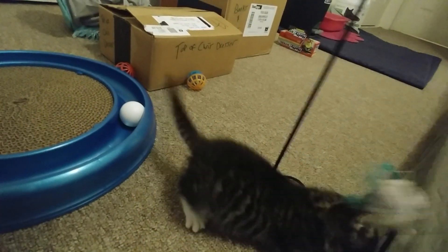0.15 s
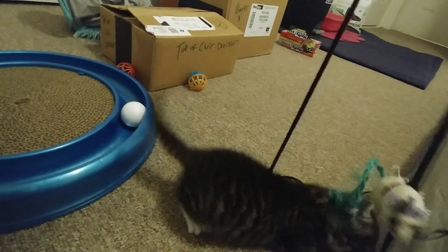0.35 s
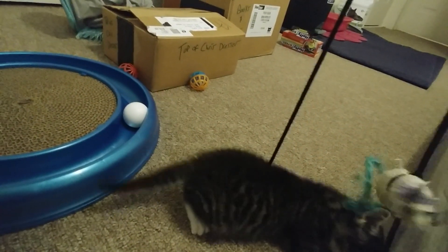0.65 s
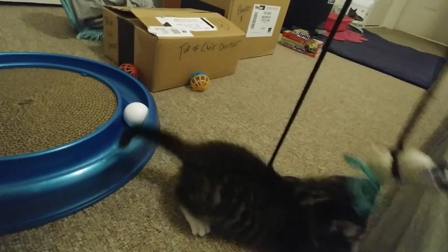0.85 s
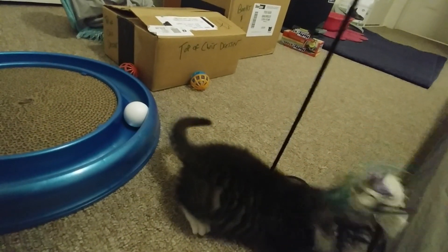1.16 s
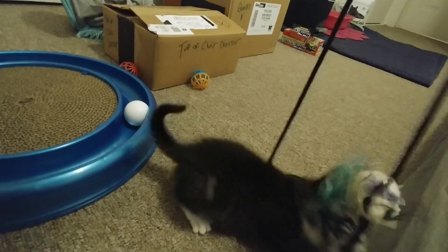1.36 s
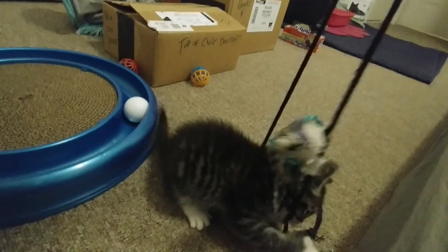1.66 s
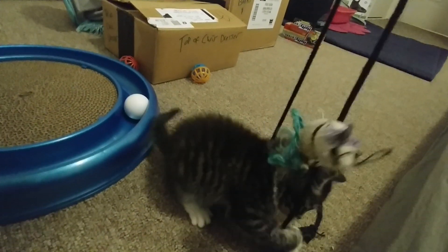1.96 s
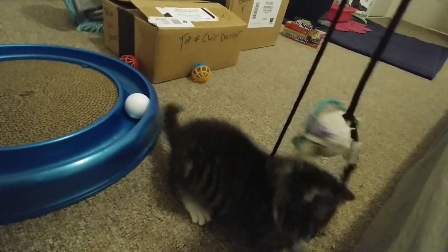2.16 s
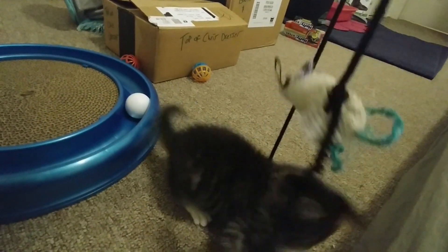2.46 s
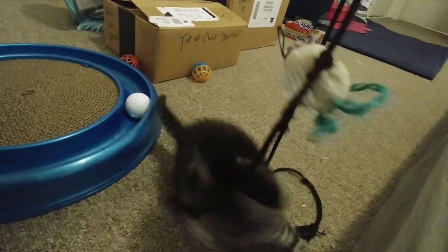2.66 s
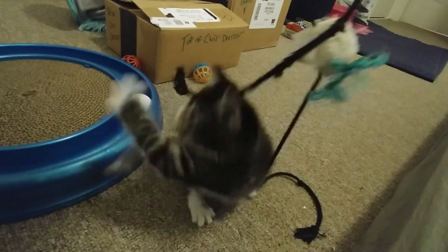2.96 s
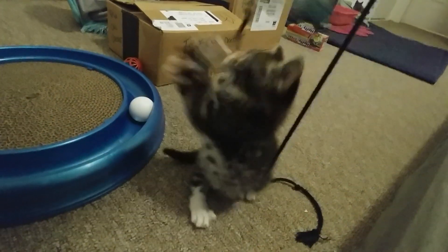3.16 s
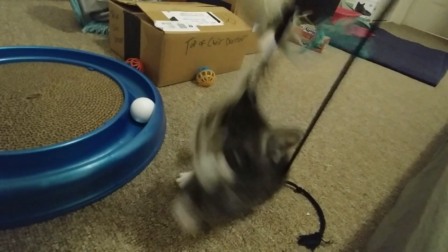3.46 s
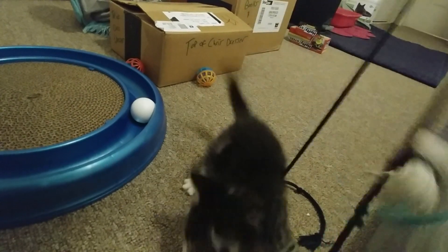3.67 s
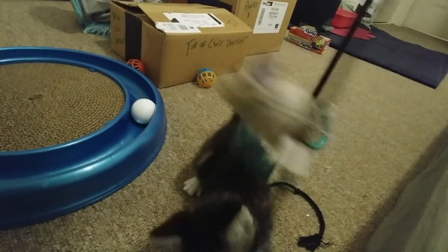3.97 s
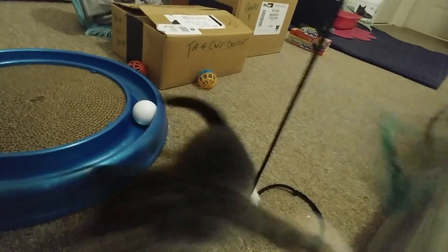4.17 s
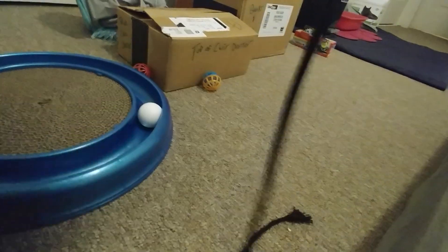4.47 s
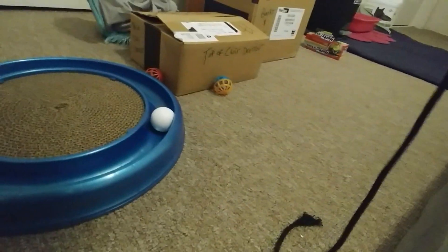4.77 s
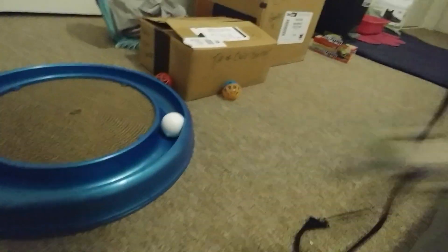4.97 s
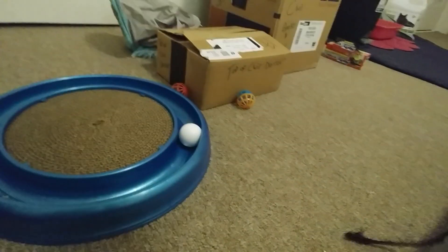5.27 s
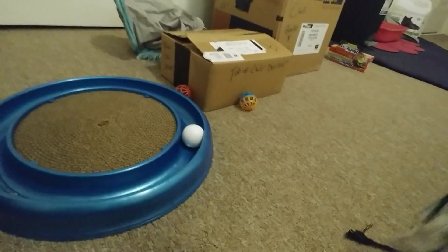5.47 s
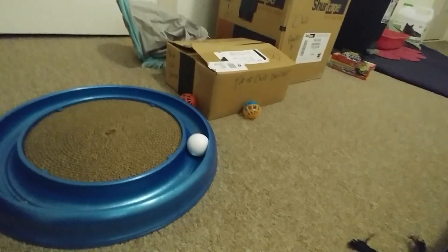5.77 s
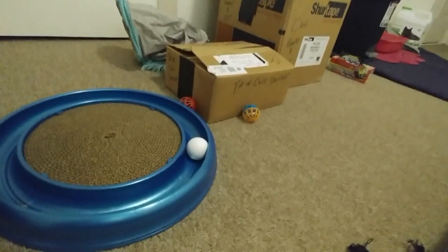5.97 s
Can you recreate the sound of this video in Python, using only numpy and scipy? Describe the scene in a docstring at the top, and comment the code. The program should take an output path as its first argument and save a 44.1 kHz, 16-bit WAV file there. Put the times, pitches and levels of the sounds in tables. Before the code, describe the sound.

A quiet low rumble and fine hiss fill a small room throughout. Right at the start a kitten lunges at a soft toy, with a dull paw thump and a short rasp of fur on cloth, close to the microphone. Very faint, thin high squeaks come and go during the first two seconds, with claw clicks near 0.9 and 1.5 seconds. At about 2.2 seconds paws thud on carpet with a tiny rip, and more thumps and a sharp click follow around 2.7. Softer landings, ticks and light brushes are scattered from 3.4 to 4.4 seconds. The loudest moment comes at about 4.5 seconds: a quick cluster of sharp snaps from claws and the toy's cord, with heavier paw thumps. Between 5.3 and 5.7 seconds there is a click, a brief scratch and a few light steps, then only the room hiss.

```python
"""Faint squeaks over low room rumble and hiss; then a kitten lunges at a soft toy on a cord.
Fur and cloth scrape past two close microphones: thousands of tiny fibre slips per stroke.
Paws thump the carpeted floor, which rings briefly. Claws tick as they snag, rip through pile
or cloth and let go; the cord snaps taut. The small room adds a short tail."""
import sys
import numpy as np
from scipy import signal
from scipy.fft import rfft, irfft, next_fast_len
from scipy.io import wavfile
from scipy.ndimage import uniform_filter1d

SR = 44100
rng = np.random.default_rng(int(sys.argv[2]) if len(sys.argv) > 2 else 0)


def waveform_to_disk(signal):
    """Save audio, clipped to [-1, 1], as 16-bit WAV at the path in sys.argv[1]."""
    frames = np.transpose(np.atleast_2d(signal))
    scaled = np.clip(frames, -1, 1) * 32767
    samples = np.round(scaled).astype(np.int16)
    wavfile.write(sys.argv[1], SR, samples)


N = 269539

# faint squeaks (start [s], pitch [Hz], bandwidth [Hz], level [dB], length [s])
SQUEAK_EVENTS = [(-.045, 7170, 210, -61, 0.17), (0.01, 3130, 110, -63.5, .22),
                 (0.527, 8160, 330, -64.5, .15), (0.536, 5170, 199.2, -73.5, 0.18),
                 (0.891, 3010, 200, -62.5, 0.16), (0.944, 5110, 270, -72, .19),
                 (0.999, 3230, 345, -61, 0.16), (1.217, 6070, 300, -73, 0.12),
                 (1.296, 3560, 660, -64.5, 0.15), (1.298, 7140, 70, -76, 0.15), (1.823, 5260, 70, -80, .19)]
# rumble and hiss spectrum (frequency [Hz], relative level [dB])
AIR_SPECTRUM = [(25, -40), (37, -17.5), (86, -1), (123, -19), (161, -7), (200, -15.5), (316, -16.5),
                (604, -20), (750, -21.5), (4450, -30.5), (5370, -28.5), (8050, -37), (15800, -40)]
# rumble and hiss likeness (frequency [Hz], left-right correlation [0..1])
AIR_CORRELATION = [(60, 0.74), (240, 0.39), (950, 0), (3770, 0), (15000, 0.0)]
# rumble and hiss balance (frequency [Hz], left minus right [dB])
AIR_BALANCE = [(300, 3), (12000, 0.5)]
# light touches of fur and toy (peak time [s], level [dB], length [s], ring [Hz])
BRUSH_EVENTS = [(0.075, -64, 0.15, 2480), (0.132, -45.5, 0.012, 3060), (0.265, -58, 0.02, 3220),
                (0.4, -47, 0.017, 1460), (0.482, -59.5, 0.079, 1270), (0.769, -50.5, 0.038, 1350),
                (0.801, -44.5, 0.036, 1580), (1.424, -67, 0.13, 5560), (2.172, -51, 0.063, 1350),
                (2.494, -55.5, 0.02, 4870), (3.157, -64.5, 0.036, 5700), (4.145, -60.5, 0.077, 1070),
                (4.193, -53.5, 0.045, 3160), (4.331, -62, 0.093, 2600), (4.609, -49.5, 0.068, 2670),
                (5.35, -57.5, 0.062, 1470), (5.574, -55, 0.065, 2030), (5.587, -52.5, 0.02, 2600),
                (5.695, -58.5, 0.086, 1560)]
# drag rasp, then hiss (level [dB], fade [dB/s], ring [Hz], ring gain [dB], tilt [dB/octave])
DRAG_BANDS = [(-42, 105, 1650, 8.5, -2.5), (-53.5, 4, 3250, 12, -2.5)]
# rubbed cloth spectrum (frequency [Hz], relative level [dB])
RUB_SPECTRUM = [(45, -6.5), (110, 6), (200, 1.5), (450, -5), (900, -1.5), (1800, -1), (2450, -7.5),
                (3300, -6.5), (5500, -6), (8000, -15.5), (10700, -38), (13000, -27), (16000, -31.5)]
# paw landings (time [s], level [dB], floor pitch [Hz], hardness [dB], knock [Hz])
LANDINGS = [(0.118, -41, 136, -22, 300), (0.393, -51, 83, -6, 250), (0.926, -43.5, 104, -0.5, 294),
            (2.163, -37.5, 139, -8.5, 275), (2.177, -38.5, 144, -8, 363), (2.211, -31.5, 86.8, -11, 224),
            (2.487, -54.5, 116, -2.5, 313), (2.622, -36.5, 147, -0.5, 314), (2.702, -35.5, 146, -1, 310),
            (3.407, -39.5, 98.3, -17, 225), (3.421, -39.5, 87, -27, 190), (3.627, -45.5, 76, -19, 223),
            (3.669, -42.5, 82, -11.5, 225), (4.187, -49.5, 155, -7, 370), (4.383, -45.5, 185, -4.5, 340),
            (4.421, -42, 136, 1, 249), (4.497, -37.5, 131, 1, 379), (4.517, -31, 167, -3, 290),
            (4.529, -31.5, 109.4, -12, 213), (4.594, -30, 90.5, -1.5, 218), (4.725, -48.5, 145, -6, 221),
            (5.335, -53, 143, 1.5, 312), (5.482, -42, 122, -16, 370), (5.588, -45.5, 93, -4, 276),
            (5.669, -45, 138, -10, 284)]
# floor modes (frequency [Hz], relative level [dB], t60 [s])
FLOOR_RING = [(87, 0, .3), (225, -5, .25), (308, -5, .25)]
# paw pad slap spectrum (frequency [Hz], relative level [dB])
PAD_SPECTRUM = [(40, -15), (120, -8), (310, 3), (480, -12), (800, 0), (1500, -30), (16000, -69)]
# claw snags, cord snapping taut (time [s], level [dB], ring [Hz], ring gain [dB], ring width [octaves])
TICK_EVENTS = [(0.265, -43, 3600, 13, .6), (0.403, -42, 1430, -2, .4), (0.8023, -39, 1500, 16, 1),
               (0.9241, -32, 910, 19.5, 0.96), (0.924, -39.5, 7600, 14, 0.25),
               (0.941, -41.5, 7400, 13, 0.15), (1.225, -54.5, 5000, 20, 0.67),
               (1.400, -47.5, 5770, 8, 0.22), (1.524, -37.5, 7640, 30, 0.13), (2.15, -46, 5460, -6, .3),
               (2.162, -44, 4470, 11, 0.27), (2.2608, -45.5, 4500, 4, .5), (2.486, -48, 4850, 6, .3),
               (2.69, -38.5, 1700, 6, 0.22), (2.7009, -27, 4070, 3, 0.48), (3.029, -51.5, 4640, 34, 0.27),
               (3.668, -50, 1440, 13, 0.3), (3.8796, -41.5, 4520, 15, 0.28), (4.192, -36, 1270, 9, 0.19),
               (4.386, -40, 2090, 11, 0.34), (4.4807, -35, 1500, 8, .4), (4.497, -28, 900, 16, 0.51),
               (4.5097, -20, 1564, 14.5, 0.16), (4.5108, -20, 5730, 11.5, 0.17),
               (4.5135, -23.5, 1630, -17, 0.58), (4.5951, -34.5, 2370, 23, 0.28),
               (4.599, -34, 2330, 33, 0.17), (5.337, -42, 2060, 15.5, 0.63)]
# fibre snap spectrum (frequency [Hz], relative level [dB])
SNAP_SPECTRUM = [(60, -12.5), (250, 3.5), (500, -4), (1000, -4.5), (1900, -5.5), (2700, -14.5),
                 (3800, -9.5), (6000, -13.5), (8500, -17), (10700, -42), (13000, -24), (16000, -31)]
# claws tearing free (start [s], level [dB], length [s], ring [Hz], tilt [dB/octave])
RIP_EVENTS = [(2.184, -30.5, 0.022, 4250, 0.1), (2.612, -35.5, 0.01, 730, -13),
              (4.491, -33, 0.013, 850, -1), (4.508, -26, 0.0023, 5600, 6), (4.5935, -35, 0.0068, 2400, 0.5),
              (5.455, -32.5, 0.033, 2100, 5.5), (5.456, -38.5, 0.035, 6640, 10.5)]
# direction of the play (time [s], left lead [ms], left minus right [dB])
PLAY_BEARING = [(.9, -0.29, 1), (2.2, -0.31, 4), (2.7, -0.22, 0), (3.9, 0.048, 7.5), (4.2, -0.035, -1.5),
                (4.5, 0.337, 0), (5.35, 0.354, -2), (5.45, -0.33, -6.5)]
# left microphone faces the play, right is shaded (frequency [Hz], left minus right [dB])
MIC_SHADE = [(250, -1.5), (700, 7.5), (1400, 9.5), (2700, 7), (4500, 10), (7500, 0), (14000, 7.5)]
# room decay (frequency [Hz], t60 [s])
ROOM_T60 = [(100, 0.47), (1000, 0.13), (5000, 0.14), (16000, 0.17)]
SIDES = np.array([[.5], [-.5]])  # left and right shares of a balance


def amp(db):
    """Decibels to gain."""
    return 10 ** (np.asarray(db) / 20)


def unit_rms(x):
    """Scales to rms 1."""
    return x / np.sqrt(np.mean(x ** 2) + 1e-20)


def lookup(points, hz):
    """Reads a table on a log-frequency axis."""
    f, value = np.transpose(points)
    return np.interp(np.log(hz + 1), np.log(f + 1), value)


def add(mix, time_s, sound):
    """Mixes a stereo sound in at time_s."""
    start = round(time_s * SR)
    sound = sound[:, max(-start, 0):]
    part = mix[:, max(start, 0):][:, :sound.shape[1]]
    part += sound[:, :part.shape[1]]


def impulse(colour_db, size=2048):
    """Minimum-phase impulse response, energy 1, with spectrum colour_db(Hz)."""
    hz = abs(np.fft.fftfreq(size, 1 / SR))
    log_gain = np.log(amp(np.maximum(colour_db(hz), -100)))
    response = np.fft.ifft(np.exp(np.conj(signal.hilbert(log_gain)))).real[:size // 2]
    return response / np.linalg.norm(response)


def bump(hz, centre_hz, octaves):
    """Resonance curve, 1 at its centre."""
    return np.exp(-.5 * (np.log2((hz + 1) / centre_hz) / octaves) ** 2)


def placed(x, time_s):
    """Two microphones on a small body: each gets its own delay and colour."""
    times_s, leads_ms, pans_db = np.transpose(PLAY_BEARING)
    lead_ms, pan_db = np.interp(time_s, times_s, leads_ms), np.interp(time_s, times_s, pans_db)
    x = np.pad(x, ((0, 0), (16, 128)))
    size = next_fast_len(x.shape[1])
    hz = np.fft.rfftfreq(size, 1 / SR)
    delay_s = np.maximum(-2 * SIDES * lead_ms, 0) / 1000
    gain = amp(SIDES * (pan_db + lookup(MIC_SHADE, hz)))
    return irfft(rfft(x, size) * np.exp(-2j * np.pi * hz * delay_s) * gain, size)


def squeaks(sag=0.022, peak_at=0.29, pure_width_hz=45):
    """Thin, fuzzy whistles that swell fast and sag in pitch; narrow ones have a pure core."""
    out = np.zeros((2, N))
    for start_s, hz, width_hz, db, length_s in SQUEAK_EVENTS:
        progress = np.arange(0, length_s, 1 / SR) / length_s
        noise = rng.standard_normal((2, SR)) + 1j * rng.standard_normal((2, SR))
        lowpass = signal.butter(2, width_hz / 2, fs=SR, output="sos")
        fuzz = signal.sosfilt(lowpass, noise)[:, -len(progress):]
        pitch_hz = hz * (1 + sag * (peak_at - progress))
        carrier = np.exp(2j * np.pi * np.cumsum(pitch_hz) / SR)
        tone = unit_rms(((fuzz / fuzz.std() + pure_width_hz / width_hz) * carrier).real)
        swell = (progress / peak_at * np.exp(1 - progress / peak_at)) ** 2
        add(out, start_s, amp(db) * tone * swell)
    return out


def air(level_db=-66.5, waver_db=-0.82, top_db=3, top_hz=14500):
    """Low room rumble and fine hiss, wavering slightly."""
    frames, hz = N // 512 + 5, np.fft.rfftfreq(2048, 1 / SR)
    left_re, left_im, own_re, own_im, waver = rng.standard_normal((frames, len(hz), 5)).T
    waver = unit_rms(uniform_filter1d(uniform_filter1d(waver, size=60, axis=0), size=10, axis=1))
    correlation = lookup(AIR_CORRELATION, hz)[:, None]
    left = left_re + 1j * left_im
    right = correlation * left + np.sqrt(1 - correlation ** 2) * (own_re + 1j * own_im)
    colour_db = lookup(AIR_SPECTRUM, hz) + top_db * bump(hz, top_hz, octaves=.25)
    stereo_db = colour_db + SIDES * lookup(AIR_BALANCE, hz)
    spectra = np.array([left, right]) * amp(stereo_db[:, :, None] + waver_db * waver)
    sound = signal.istft(spectra, nperseg=2048, noverlap=1536)[1][:, :N]
    return amp(level_db) * sound / sound.mean(0).std()


def brushes(ring_db=5, rise_share=0.28, neutral_hz=2600, scuff_db=-9, scuff_s=0.019, scuff_hz=650):
    """Strokes that swell and fade: light touches, plus a scuff per landing."""
    scuffs = [(time_s + rise_share * scuff_s, db + hardness_db + scuff_db, scuff_s, scuff_hz)
              for time_s, db, _, hardness_db, _ in LANDINGS]
    for peak_s, db, length_s, ring_hz in BRUSH_EVENTS + scuffs:
        rise_s, fall_s = rise_share * length_s, (1 - rise_share) * length_s
        t = np.arange(-3 * rise_s, 6 * fall_s, 1 / SR)
        envelope = amp(db) * np.exp(-np.where(t < 0, (t / rise_s) ** 2, t / fall_s))
        tilt_db_oct = 3.5 * np.log2(ring_hz / neutral_hz)  # quicker brush: higher ring, brighter
        yield peak_s + t[0], envelope, ring_hz, ring_db, tilt_db_oct


def drag(start_s=0.11, length_s=0.24, attack_s=0.015, hold_s=0.065, release_s=0.028):
    """Strokes of the lunge: the body bites on cloth at once, holds, then loses speed."""
    t = np.arange(0, length_s + 6 * release_s, 1 / SR)
    contact = (1 - np.exp(-t / attack_s)) * np.exp(-np.maximum(t - length_s, 0) / release_s)
    for db, fade_db_per_s, ring_hz, ring_db, tilt_db_oct in DRAG_BANDS:
        envelope = contact * amp(db - fade_db_per_s * np.maximum(t - hold_s, 0))
        yield start_s, envelope, ring_hz, ring_db, tilt_db_oct


def scrapes(strokes, gain_db=-1, slips_per_s=10000, spread_db=2, ring_octaves=0.4, slack_ratio=0.82):
    """Sounds each stroke as clumps of tiny fibre slips; the ring climbs with pressure."""
    out = np.zeros((2, N))
    slips = (rng.random((3, N)) < slips_per_s / SR) * rng.standard_normal((3, N))
    slips = unit_rms(slips * amp(spread_db * np.minimum(rng.exponential(1, (3, N)), 4)))
    clumps_db = 3 * np.tanh(unit_rms(uniform_filter1d(rng.standard_normal(N), size=130)))
    slips = unit_rms((slips[0] + slips[1:]) * amp(clumps_db))  # shared fibres + each microphone's own
    for start_s, envelope, pressed_hz, ring_db, tilt_db_oct in strokes:
        span = (round(start_s * SR) + np.arange(len(envelope))) % N
        pressure = envelope / envelope.max()
        sound = 0
        for share, ring_hz in ((1 - pressure, slack_ratio * pressed_hz), (pressure, pressed_hz)):
            cloth = impulse(lambda f: lookup(RUB_SPECTRUM, f)
                            + ring_db * bump(f, ring_hz, ring_octaves)
                            + tilt_db_oct * np.log2(np.maximum(f / 300, 1)))
            sound = sound + signal.fftconvolve(slips[:, span] * envelope * share, cloth[None], axes=1)
        add(out, start_s, placed(amp(gain_db) * sound, start_s))
    return out


def thumps(rise_cycles=0.23, fall_cycles=1.63, ring_db=-23, slap_db=-17, slap_fall_s=0.014,
           knock_db=2, knock_fall_s=0.0092, pan_db=5):
    """A paw pushes the carpeted floor: a few low swings, a dull slap and knock; the floor rings on."""
    out, t = np.zeros((2, N)), np.arange(SR // 2) / SR
    pad = impulse(lambda f: lookup(PAD_SPECTRUM, f))
    for time_s, db, hz, hardness_db, knock_hz in LANDINGS:
        onset = 1 - np.exp(-(t * hz / rise_cycles) ** 2)
        swing = onset * np.exp(-t * hz / fall_cycles) * np.sin(2 * np.pi * hz * t)
        knock = onset * np.exp(-t / knock_fall_s) * np.sin(2 * np.pi * knock_hz * t)
        ring = 0
        for mode_hz, mode_db, t60_s in FLOOR_RING:
            mode = np.sin(2 * np.pi * mode_hz * rng.uniform(0.96, 1.03) * t) * rng.choice([-1, 1])
            ring = ring + onset * amp(mode_db - 60 * t / t60_s) * mode
        slap = signal.fftconvolve(rng.standard_normal(len(t)) * np.exp(-t / slap_fall_s), pad)[:len(t)]
        impact = amp(slap_db) * slap + amp(knock_db) * knock
        sound = swing / abs(swing).max() + amp(ring_db) * ring + amp(hardness_db) * impact
        add(out, time_s, amp(db + SIDES * pan_db) * sound)
    return out


def ticks(gain_db=12, crackle_db=-19, crackle_fall_s=0.0017):
    """A fibre slips off a claw: one sharp snap, then its neighbours crackle."""
    out, t = np.zeros((2, N)), np.arange(1024) / SR
    for time_s, db, ring_hz, ring_db, ring_octaves in TICK_EVENTS:
        snap = impulse(lambda f: lookup(SNAP_SPECTRUM, f) + ring_db * bump(f, ring_hz, ring_octaves))
        crackle = amp(crackle_db) * rng.standard_normal((2, len(t))) * np.exp(-t / crackle_fall_s)
        sound = signal.fftconvolve((t == 0) + crackle, snap[None], axes=1)
        add(out, time_s, placed(amp(db + gain_db) * sound, time_s))
    return out


def rips(ring_db=12.5, attack_s=0.0025, swell_db=9.5, release_share=0.21):
    """Strokes of claws in pile or cloth: catch at once, grow with the pull, come free."""
    for start_s, db, length_s, ring_hz, tilt_db_oct in RIP_EVENTS:
        t = np.arange(0, 3 * length_s, 1 / SR)
        pull = (1 - np.exp(-t / attack_s)) * amp(db + swell_db * np.minimum(t / length_s - 1, 0))
        release = np.exp(-np.maximum(t / length_s - 1, 0) / release_share)
        yield start_s, pull * release, ring_hz, ring_db, tilt_db_oct


def room(x, first_echo_s=.006, early_db=9, early_fall_s=0.0038, echoes_per_s=4000, right_db=-4.5):
    """Stereo echoes of the left channel: close furniture first, then a short tail dying band by band."""
    t = np.arange(SR // 2) / SR
    taps = rng.standard_normal((2, len(t))) * (rng.random((2, len(t))) < echoes_per_s / SR)
    taps *= (t > first_echo_s) * (1 + amp(early_db) * np.exp(-t / early_fall_s))
    lowpass = signal.butter(2, 600, fs=SR, output="sos")
    taps[1] += signal.sosfiltfilt(lowpass, taps[0] - taps[1])  # long waves reach both microphones alike
    hz, frame_s, spectra = signal.stft(taps, SR, nperseg=256)
    decay = amp(-60 * frame_s / lookup(ROOM_T60, hz)[:, None])
    tail = signal.istft(spectra * decay, SR, nperseg=256)[1]
    tail /= np.linalg.norm(tail, axis=1, keepdims=True)
    return signal.fftconvolve(x[:1], tail, axes=1)[:, :N] * amp([[0], [right_db]])


def scene(contact_wet_db=-11, thump_wet_db=-16):
    """The kitten's play in its room."""
    contact = ticks() + scrapes([*drag(), *brushes(), *rips()]) + squeaks()
    paws = thumps()
    echoes = room(amp(contact_wet_db) * contact + amp(thump_wet_db) * paws)
    return contact + paws + echoes + air()


def record(dry, low_cut_hz=46, high_cut_hz=16000):
    """The microphones lose the deepest bass and the top treble."""
    thinned = signal.sosfilt(signal.butter(7, low_cut_hz, "high", fs=SR, output="sos"), dry)
    lowpass = signal.firwin(511, high_cut_hz, window=("kaiser", 9), fs=SR)
    return signal.oaconvolve(thinned, lowpass[None], "same")


dry = scene()
out = record(dry)
waveform_to_disk(out)
```